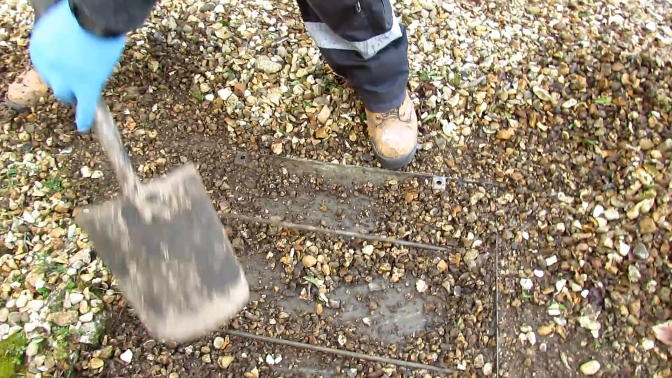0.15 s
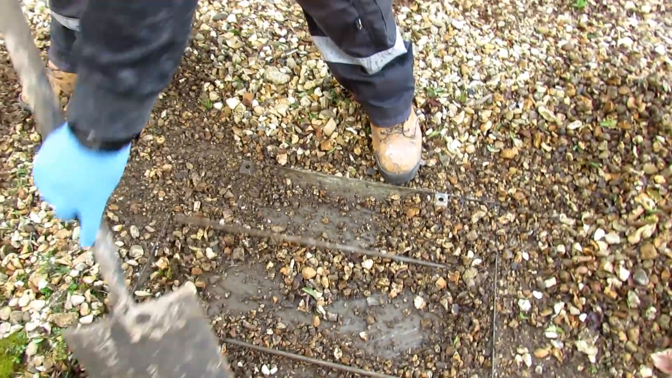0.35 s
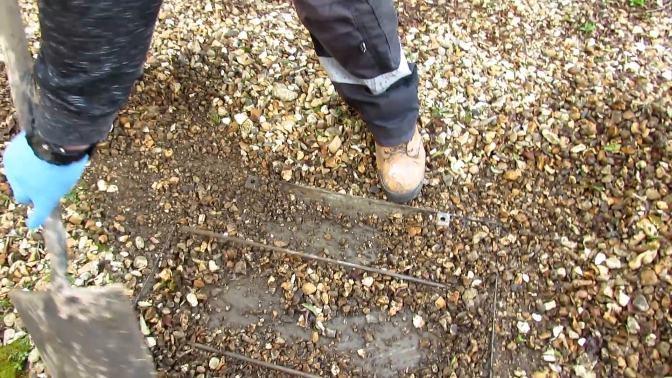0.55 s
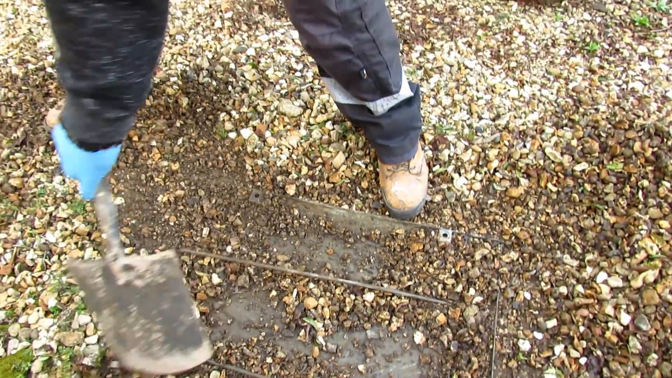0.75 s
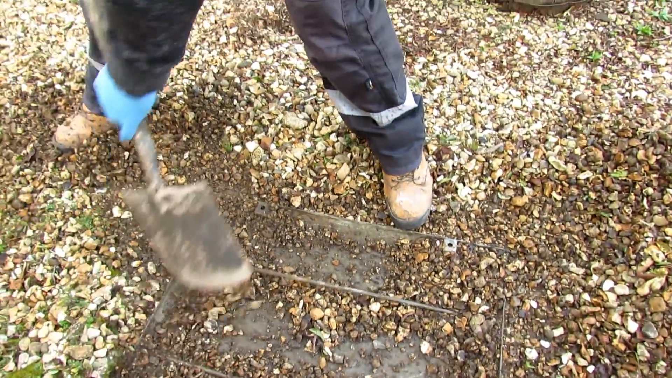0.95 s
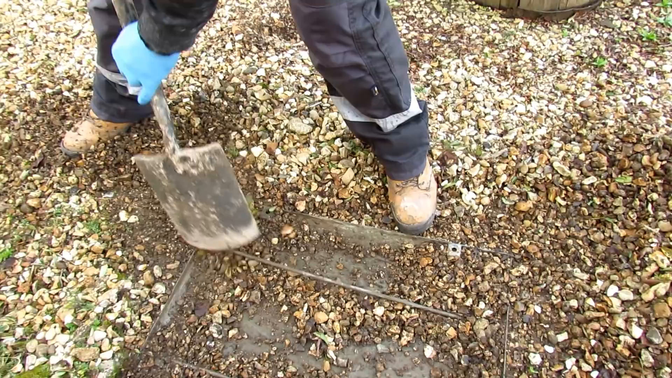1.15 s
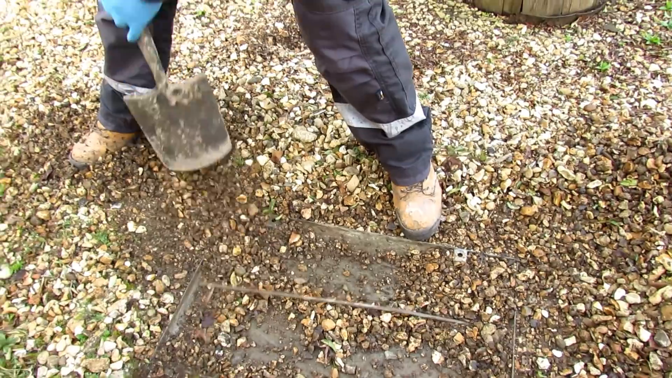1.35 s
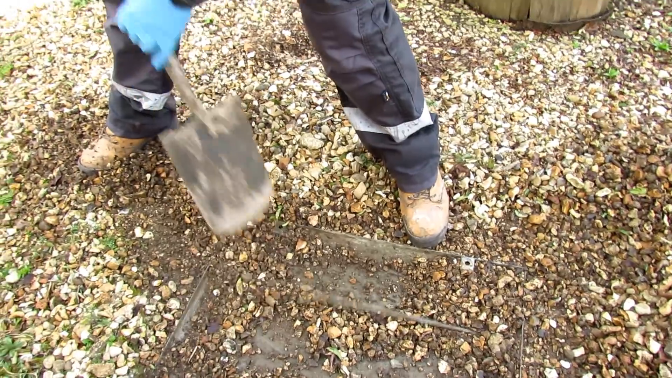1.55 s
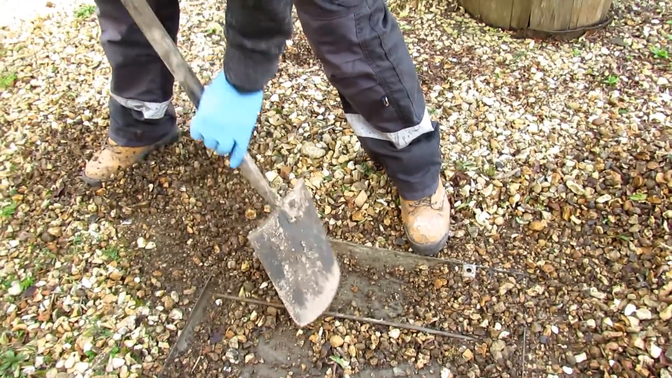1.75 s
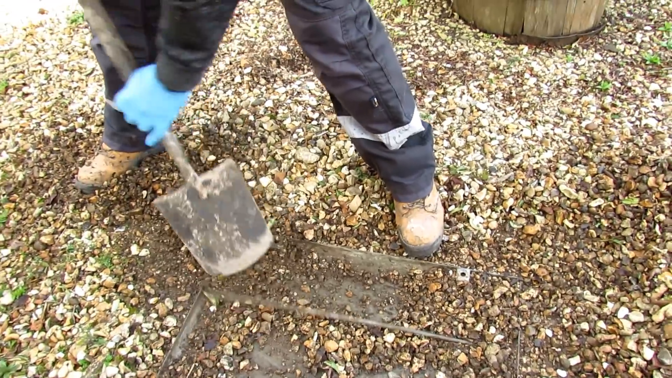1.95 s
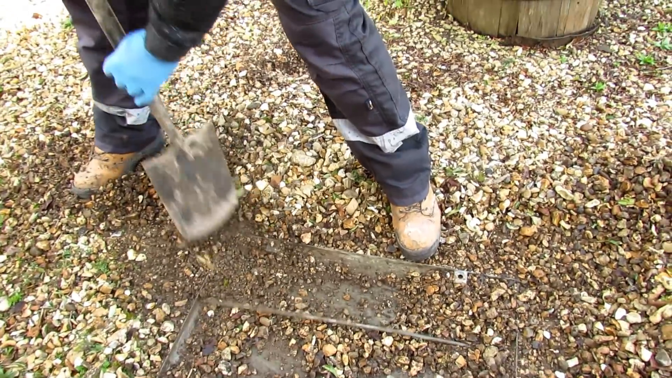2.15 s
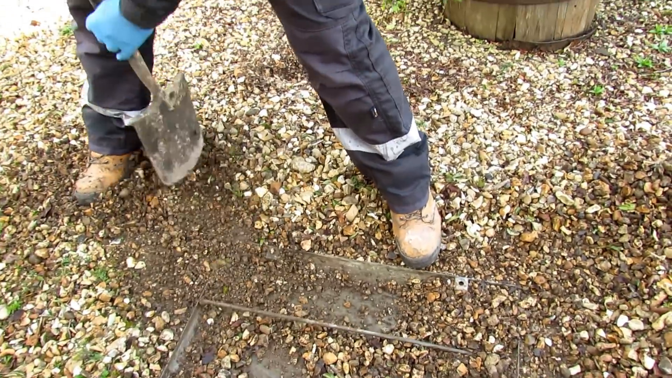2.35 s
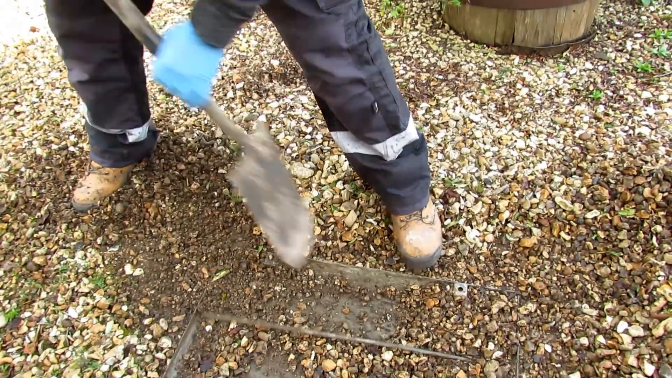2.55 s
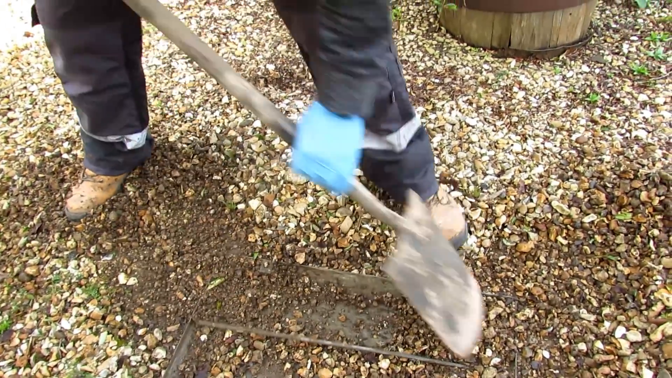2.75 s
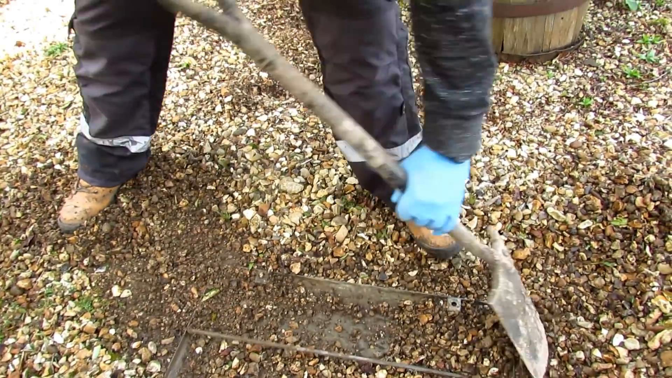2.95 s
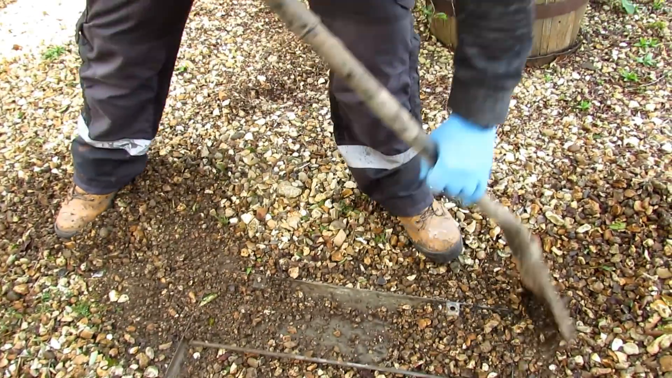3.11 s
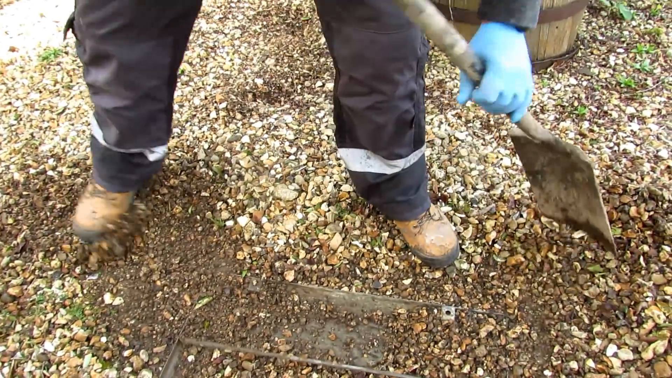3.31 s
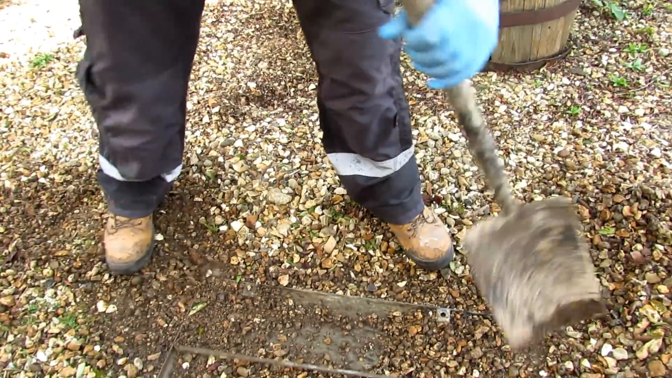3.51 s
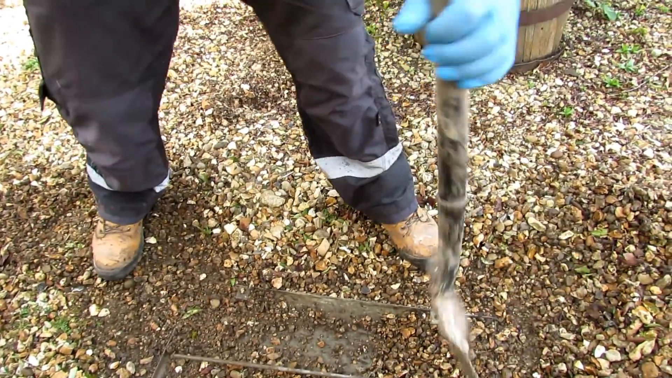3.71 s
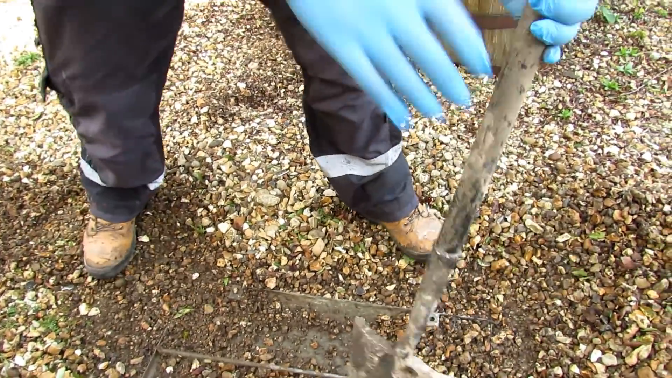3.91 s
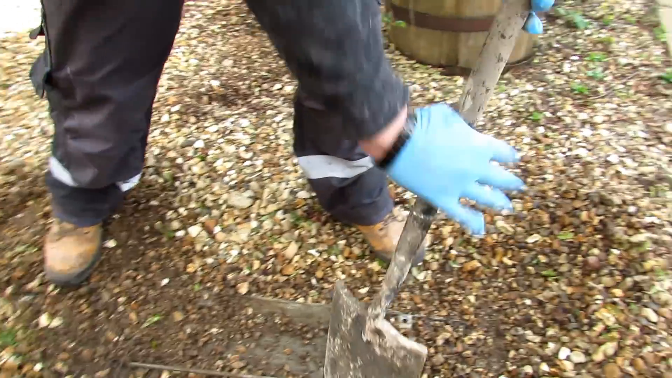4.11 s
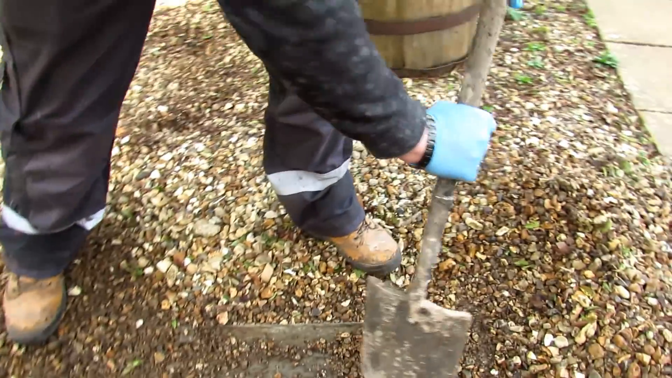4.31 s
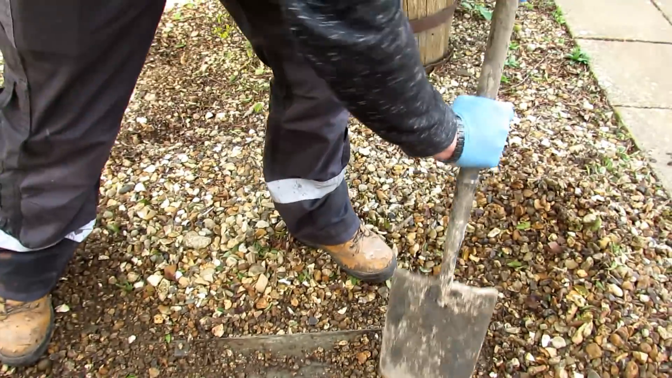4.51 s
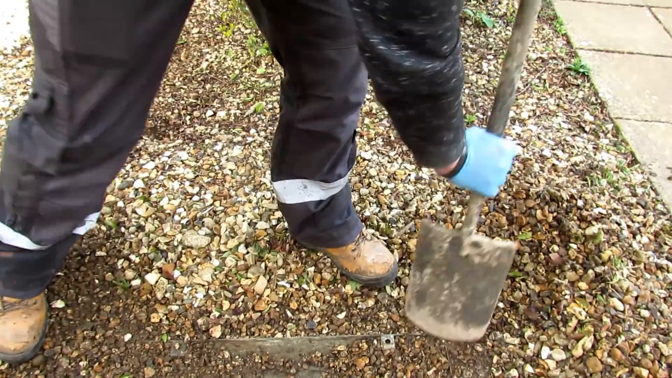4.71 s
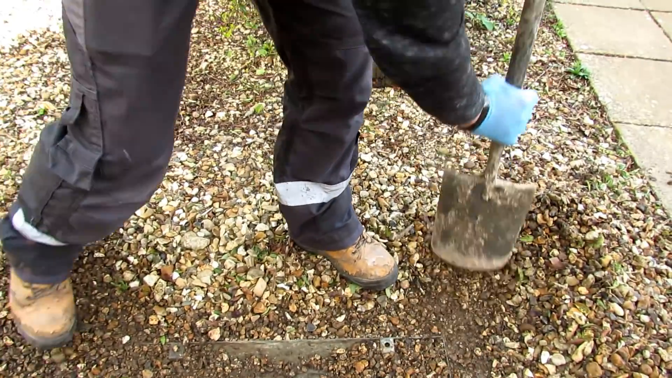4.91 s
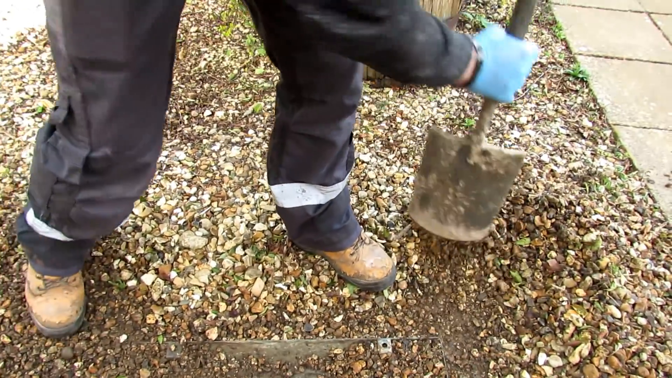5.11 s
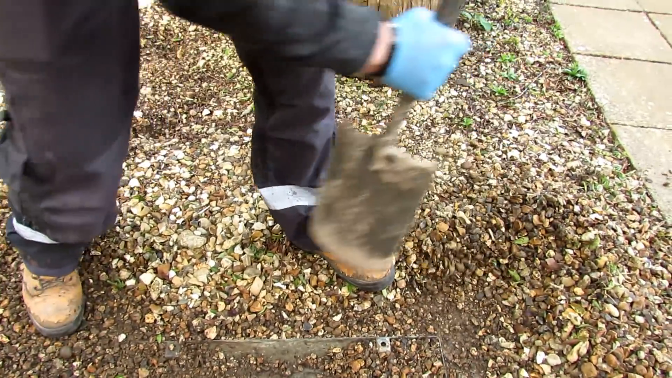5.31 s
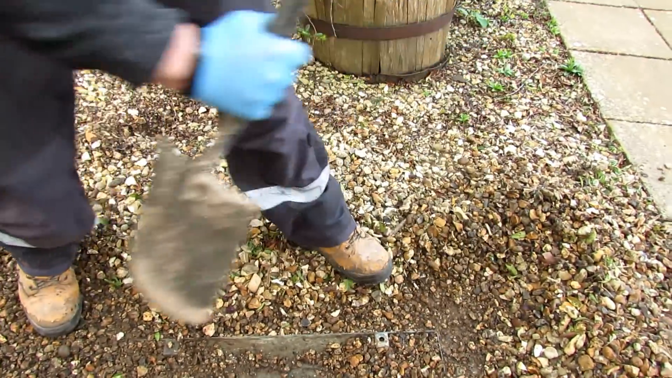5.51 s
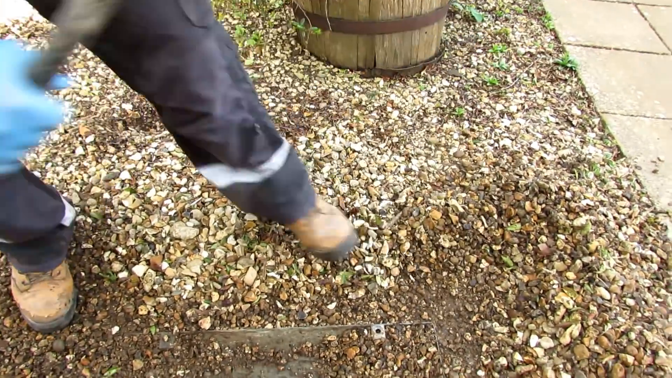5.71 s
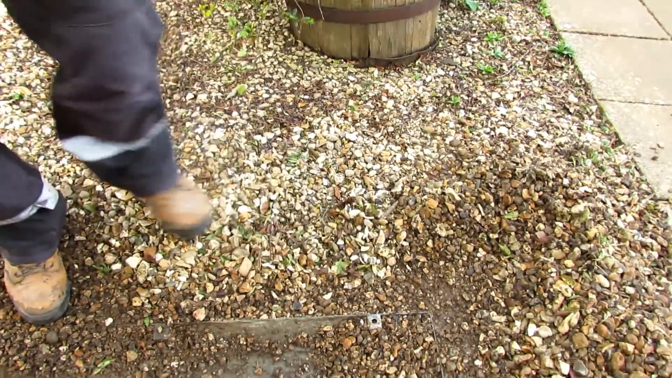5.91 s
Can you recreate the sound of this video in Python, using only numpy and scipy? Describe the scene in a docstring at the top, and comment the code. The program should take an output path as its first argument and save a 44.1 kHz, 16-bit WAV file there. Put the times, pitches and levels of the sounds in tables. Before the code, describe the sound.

Outdoors, close to a hand-held stereo microphone. Loose stones click and cloth brushes briefly in the first 0.25 seconds. From about 0.4 to 1.3 seconds a steel spade scrapes hard through gravel, coarse and bright, with rapid clattering knocks and short blade rings; it catches near 1.1 seconds, then finishes in a thinner rasp. A quiet gap leaves soft rustling and low rumble. A second grinding stroke runs from 1.75 to 2.3 seconds, starting abruptly and ending in sharp grit. Cloth swishes and dull taps follow; around 3.0 to 3.3 seconds the spade lightly knocks the ground with a faint ring and ticking pebbles. Muffled handling bumps and rustling fill the pause, the rumble swelling near 3.75. The third scrape, from 4.3 to 5.1 seconds, is crunchy with metallic clanks. Afterwards small stones tick and clothes rustle until 6 seconds, over faint far traffic.

```python
"""A steel spade is dragged in three strokes (the first catches halfway) through loose gravel over a drain
cover, and knocks the ground once between. Clumped random contacts make the grinding; bursts of them make
the knocks. Both excite resonators for the blade, the shaft and the stones. Loose stones tick, work clothes
swish (enveloped noisy grains), far traffic hums under shifting gravel (shaped noise), and wind and handling
rumble on the two ports of a hand-held recorder (low noise, largely opposite in the two channels)."""
import sys
import numpy as np
from scipy import signal
from scipy.fft import rfft, irfft, next_fast_len
from scipy.io import wavfile

SR = 44100
rng = np.random.default_rng(int(sys.argv[2]) if len(sys.argv) > 2 else 0)


def log_audio(samples):
    """Write samples as a 16-bit WAV file to the path given in sys.argv[1]."""
    # one column per channel
    frames = np.atleast_2d(samples).T
    # limit to full scale, then quantise
    limited = np.clip(frames, -1, 1)
    pcm = np.round(limited * 32767).astype(np.int16)
    wavfile.write(sys.argv[1], SR, pcm)


N = 267538   # length in samples
TINY = 1e-12   # keeps resonators from idling on exact zeros

# colour of stone on stone: (frequency [Hz], relative density [dB per Hz])
STONE_COLOUR = [(1000, -110), (2500, 2), (4500, 1), (7000, 8), (11000, 7), (16400, -8)]


def from_db(db):
    """Gain of a level in dB."""
    return 10 ** (np.asarray(db) / 20)


def rms_one(x):
    """Scale to unit rms."""
    return x / np.sqrt(np.mean(x ** 2) + 1e-20)


def sides(pan_db):
    """Left and right gains for a left-right difference in dB."""
    return from_db(np.array([pan_db / 2, -pan_db / 2]))


def in_time(tables, quiet_db=None):
    """Table columns at every sample; with quiet_db the first column falls to it outside the tables."""
    t = np.arange(N) / SR
    rows = np.vstack(tables)
    columns = [np.interp(t, rows[:, 0], column) for column in rows[:, 1:].T]
    if quiet_db is not None:
        inside = sum((t >= table[0][0]) & (t <= table[-1][0]) for table in tables)
        columns[0] = np.where(inside, columns[0], quiet_db)
    return columns


def response(spectrum, size=8192):
    """Causal (minimum-phase) impulse response of a spectrum, by folding its cepstrum."""
    hz, level_db = np.transpose(spectrum)
    log_hz = np.log(np.fft.rfftfreq(size, 1 / SR) + 1)
    cepstrum = irfft(np.log(from_db(np.interp(log_hz, np.log(hz), level_db))))
    cepstrum[1:size // 2] *= 2
    cepstrum[size // 2 + 1:] = 0
    return irfft(np.exp(rfft(cepstrum)))


def colour(x, spectrum):
    """Filter by a spectrum; white noise keeps its rms."""
    h = response(spectrum)
    h = (h / np.linalg.norm(h)).reshape((1,) * (x.ndim - 1) + (-1,))
    return signal.oaconvolve(x, h, axes=-1)[..., :N]


def resonance(x, hz, width_hz):
    """One mode: a two-pole resonator, gain 1 at its centre."""
    r = np.exp(-np.pi * width_hz / SR)
    gain = (1 - r * r) / 2
    return signal.lfilter([gain, 0, -gain], [1, -2 * r * np.cos(2 * np.pi * hz / SR), r * r], x)


def drift(rate_hz):
    """Slow random wander with unit rms: noise through two equal low-pass poles, at a 20th of the rate."""
    r = np.exp(-2 * np.pi * rate_hz * 20 / SR)
    noise = rng.standard_normal(N // 20 + 2002)
    slow = signal.lfilter([1], [1, -2 * r, r * r], noise)[2000:]   # skip the settling
    return np.interp(np.arange(N) / 20, np.arange(len(slow)), rms_one(slow))


def grains(per_s, spread_db, clump_db):
    """Random contacts of uneven size in clumps; both ports share a part and each has its own."""
    # part of the contacts that only one port hears: (frequency [Hz], level [dB])
    scatter = [(100, -7), (1000, -19), (3000, -2), (8000, 2.5), (15000, 0.5)]
    sizes = from_db(spread_db * np.minimum(rng.exponential(1, (3, N)), 4)) * rng.choice([-1, 1], (3, N))
    happens = rng.random((3, N)) < per_s / SR
    clumps = from_db(clump_db * (drift(16.7) + drift(94)))
    shared, *own = rms_one(sizes * happens * clumps)
    return shared + signal.oaconvolve(own, response(scatter)[None, :512], axes=1)[:, :N]


def bursts(at_s, level_db, t60_s, pan_db, rise_s=None):
    """Stereo envelopes of blows: each sets in, at once or over rise_s, and dies away by 60 dB."""
    out = np.zeros((2, N))
    for s, db, t60, pan in zip(at_s, level_db, t60_s, pan_db):
        start = round(s * SR)
        steps = np.arange(min(N - start, int(max(t60, .003) * SR)))
        rise = 1 if rise_s is None else 1 - np.exp(-steps / SR / rise_s)
        decay_db = db - 60 * steps / len(steps)
        out[:, start:start + len(steps)] += rise * from_db(decay_db + [[pan / 2], [-pan / 2]])
    return out


def swell(s, level_db, rise_s, fall_s):
    """Envelope that rises to its loudest and fades, 20 dB in each of the two times."""
    t = np.arange(N) / SR
    return from_db(level_db - 20 * np.where(t < s, (s - t) / rise_s, (t - s) / fall_s))


def spade():
    """Grinding and knocks share the gravel's colour, the ringing blade, the shaft and the grit."""
    # gravel, fine grit, and shaft with ground: (frequency [Hz], relative density [dB per Hz])
    gravel = [(290, -52.5), (600, -7.5), (1200, -4), (2200, -3), (3200, -1), (5000, -2), (7000, -2),
              (9100, -17), (15400, -90.5)]
    fine_grit = [(2940, -25.5), (5000, 0.5), (6440, 4.5), (6970, -9), (14900, -17), (15800, -38),
                 (16400, -30)]
    shaft_and_ground = [(41, -38), (70, -11.5), (200, -0.5), (280, -4.5), (358, -12.5), (476, -10.5),
                        (560, -11.5), (687, -10.5), (800, -8), (1040, -55), (1760, -120)]
    grind_body, grind_low, grind_high, low_modes, high_modes, uneven_db = grinding()
    knock_body, knock_low, knock_high, struck = knocking()
    ringing = blade(low_modes + struck, high_modes + struck, wander_db=2.0, damping_db=uneven_db)
    body = from_db(-4.5) * colour(grind_body + knock_body + ringing, gravel)
    push = grind_low + knock_low
    shaft = push + from_db(-7.5) * resonance(push, hz=210.8, width_hz=8)
    return body + colour(shaft, shaft_and_ground) + colour(grind_high + knock_high, fine_grit)


def grinding():
    """Dense contacts follow the strokes and feed stones, shaft, grit and blade modes in changing shares."""
    # blade in the gravel, a table a stretch, levels before the trims below: (time [s], grinding [dB],
    # low-mode ring re grinding [dB], high-mode ring re grinding [dB], fine grit re grinding [dB])
    strokes = [
        [(0.386, -39.5, -9, -7, -17), (0.448, -36, 1, -8, -8), (0.48, -26.5, 8, -25, -27),
         (0.498, -28, -28, -1, 0), (0.546, -20, 0.5, -9.5, -16.5), (0.606, -41, 5.5, -22, -9),
         (0.624, -29.5, -5.5, -7, -12), (0.756, -32.5, -10.5, -7.5, -9.5), (0.866, -21, -17.5, -17.5, -11),
         (0.894, -44, -2, -8, -10), (0.904, -17, -19, -4, -8), (0.944, -20.5, -9, -19, -13),
         (1.024, -14, -19, -23, -13), (1.11, -42.5, -9, -4, -7)],
        [(1.112, -41, -2, -9, -3.5), (1.192, -17.5, -13.5, 1, -10), (1.21, -38, -17, -8, -2),
         (1.216, -39, -28, -18, 1.5), (1.26, -26, -22, -6.5, -8.5), (1.47, -69, -7, -26, 1)],
        [(1.759, -10, -5, -27, -21), (1.777, -39, -17, 11, -1), (1.793, -32, -21, -5, -4),
         (1.827, -45.5, -22, 6, -1), (1.857, -25, -2.5, -3, -18), (1.893, -18, -15, -5, 3),
         (1.937, -24.5, -10, -19, -15.5), (2.213, -32, -7, -1, 0.5), (2.225, -11, -38, -22, -2),
         (2.243, -27.5, -21, -7, -3), (2.36, -59, -9, -23, -4)],
        [(2.957, -32, -31, -14, -7), (2.987, -31, -11, -21, -14), (3.027, -57, -13, -5, -2.5),
         (3.187, -36.5, -11, -0.5, -11), (3.219, -53, 3, -8, -10), (3.245, -41.5, -17, -5, 1),
         (3.3, -52, -13, -8, -17)],
        [(4.337, -36, -12, -21, -21), (4.359, -32.5, -25, -5, -13), (4.413, -31.5, -5, -5, -18),
         (4.455, -19.5, -25, -3, -18), (4.477, -39, -2, -10, -17), (4.573, -30.5, -7.5, -4.5, -9),
         (4.589, -22.5, -21, 3, -9), (4.639, -35, -5, -2, -5.5), (4.737, -13, -6.5, -22, -20),
         (4.743, -23.5, -4.5, -8, -14), (4.911, -24, -16, -10.5, -5.5), (4.933, -33, -6, -11, -3),
         (5.08, -50.5, -5, -19, -14)],
    ]
    # how the spade is held in each stretch: (low drag re grinding [dB], unevenness of the gravel's
    # damping [dB], left-right at start [dB], left-right at end [dB])
    grips = [(-10.5, 5.5, 4, 2.5), (-14.5, 5.5, 1.5, 6), (-25.5, 4, -0.3, 4), (-15, 3.0, -3, -3),
             (-18, 2, -3.8, -1.5)]
    grind_db, low_ring_db, high_ring_db, grit_db = in_time(strokes, quiet_db=-120)
    held = []
    for rows, (drag, uneven, start_pan, end_pan) in zip(strokes, grips):
        held.append([(rows[0][0], drag, uneven, start_pan), (rows[-1][0], drag, uneven, end_pan)])
    drag_db, uneven_db, pan_db = in_time(np.vstack(held)[None])
    contacts = grains(3500, spread_db=3.0, clump_db=2.54)
    stroke = from_db(grind_db - 12.5) * sides(pan_db)
    grind = contacts * stroke
    stony = from_db(2.5) * pebbles(contacts, count=16, cycles=1.5) * stroke
    body = from_db(4.5) * grind + stony
    low, high = grind * from_db(drag_db), grind * from_db(grit_db + 12.5)
    low_modes, high_modes = grind * from_db(low_ring_db + 26.5), grind * from_db(high_ring_db + 21.5)
    return body, low, high, low_modes, high_modes, uneven_db


def pebbles(contacts, count, cycles):
    """Contacts are dealt, a few milliseconds at a time, to stones of many sizes; each rings a few cycles."""
    dealt = np.repeat(rng.integers(0, count, N // 200 + 1), 200)[:N]
    out = 0
    for k, hz in enumerate(np.geomspace(900, 7500, count)):
        out = out + resonance(contacts * (dealt == k) + TINY, hz, hz / cycles) * np.sqrt(cycles)
    return rms_one(out)


def knocking():
    """Each knock is a sudden touch and a rattle, a push down the shaft, a crack and the stone's own pitch."""
    # stones and cover against the blade, before the trims and decay factors below: (time [s],
    # peak [dB], thud re peak [dB], crack re peak [dB], blade ring re peak [dB], first touch re peak [dB],
    # pitch of the stone [Hz], 60 dB decay [s], left-right [dB])
    knocks = [(0.143, -15, -45, -14, -11, -3, 3160, 0.05, -1.5),
              (0.386, -20, -37, -28, -10, -6, 2570, 0.041, 2),
              (0.416, -21, -18.5, -25, -11, -7, 2700, 0.05, 6),
              (0.431, -20, -21, -40, -6, -9, 2820, 0.041, -1),
              (0.459, -17, -16, -30, -19, -9, 1560, 0.025, 3.5),
              (0.471, -1, -18, -26, -30, -15, 1870, 0.021, 0),
              (0.491, -6.5, -52, -12, -3, -13, 2700, 0.039, 3.5),
              (0.51, -9, -26, -15, -2.5, -5, 4720, 0.14, 4.5),
              (0.534, 3.5, -42, -24, -4, -16, 1473, 0.043, 4.0),
              (0.625, -4.5, -28, -22, -3.5, -9, 2700, 0.044, 5.5),
              (0.652, -15, -11.5, -21, 1, -11, 2750, 0.067, -0.5),
              (0.676, -13.5, -26, -27, -15, -1, 1460, 0.038, 12),
              (0.827, -10.5, -23, -22, -11, -5.5, 2910, 0.042, 3),
              (0.857, -9, -16, -23, -13, -13, 3730, 0.027, 2.5),
              (0.905, -0.5, -38, -17.5, -3.5, -8.5, 3710, 0.027, 4.0),
              (0.933, 1.5, -16.5, -26, -9, -12, 1570, 0.029, 2.0),
              (0.969, -14, -15, -17, -4, -12, 2740, 0.041, 3),
              (1.014, 0.5, -43, -14, -5.5, -18, 2380, 0.08, 1),
              (1.036, -6.5, -35, -14, 3, -12, 4900, 0.021, 3.5),
              (1.14, -19, -30, -15, -4, -12, 5330, 0.12, 2.5),
              (1.153, -11, -38, -34, -15, -14, 2800, 0.059, 2.0),
              (1.184, -7.5, -50, -31, 2, -12, 2860, 0.022, 3.5),
              (1.217, -14, -46, -15, -16, -7, 6350, 0.05, -3),
              (1.239, -28, -41, 4.5, -15, -7, 6040, 0.03, 6),
              (1.253, -5.5, -43, -12, -10, -9, 3400, 0.028, -5),
              (1.284, -16.5, -38, -9, -1.5, 1, 2510, 0.092, 1),
              (1.756, -9.5, -13.5, -28, -21, -11, 2740, 0.035, 2),
              (1.785, -7, -20, -17, -7, -9, 2720, 0.047, -2),
              (1.796, -12.5, -35, -8, -8, -4, 2730, 0.067, -1.0),
              (1.852, -14, -40, -30, -6, -11, 2700, 0.039, 0.0),
              (1.861, -8, -22.5, -28, -7, -9, 2720, 0.075, 1.0),
              (1.887, -2.5, -38, -28, -5, -5, 3700, 0.048, 1.5),
              (1.898, -7, -44, -23, -4, -5, 2660, 0.052, -7),
              (1.905, -11, -27, -8.5, -5, -9, 1900, 0.042, 9),
              (1.915, -16.5, -9.5, -3.5, -14, -9, 3870, 0.083, 0.5),
              (1.929, -14, -34, -14, -8, -9, 2710, 0.1, 1.5),
              (1.954, -13.5, -29, -9.5, -15, -12, 3840, 0.083, 2.0),
              (1.971, -2.5, -49, -23, -33, -5, 1463, 0.065, 1),
              (1.995, -2, -12, -28, -24, -3.5, 1410, 0.018, 2.0),
              (2.031, -24.5, -8, -22, -21, -5, 1180, 0.039, 4),
              (2.058, -14, -12, -31, -22, -9, 1840, 0.022, 1.5),
              (2.089, -15, -29, -31, -15, -9, 6430, 0.067, -1),
              (2.112, -8.5, -21, -18, -7, -13, 5570, 0.11, 2.0),
              (2.142, -19, -41, -22, -3, -9, 5400, 0.074, 6),
              (2.221, -16, -52, -9, -12, -13, 6300, 0.023, 11),
              (2.223, -20, -50, 5, -19, -11, 5000, 0.037, -9),
              (2.959, -23, -20, -22, -1.5, -8, 4560, 0.13, -6),
              (3.109, -25.5, -27, -18, -10, -7, 1200, 0.066, -1.5),
              (3.143, -23, -37, -18, -10, -7, 2000, 0.042, -1.5),
              (3.165, -15.5, -47, -20, -6, -5, 1984, 0.03, -2.5),
              (3.179, -19.5, -54, -21, 2, -3, 2010, 0.059, -4),
              (4.338, -22.5, -30, -32, -10, -7, 2720, 0.034, -10),
              (4.347, -22, -9, -11, -17, -9, 1545, 0.065, 2),
              (4.364, -10, -33, -43, -18, -5, 4080, 0.05, -3),
              (4.382, -18, -19, -12, -5, -9, 3000, 0.041, 3),
              (4.424, -12, -30, -18, -23, -9, 6430, 0.039, 2),
              (4.446, -5, -16.5, -43, -1, -23, 2760, 0.048, 0.5),
              (4.496, -23, -15.5, -10.5, -10, -9, 2700, 0.13, 2),
              (4.532, -14.5, -35, -17, -4, -5, 3370, 0.055, 0),
              (4.574, -13, -36, -11, -6, -7, 6740, 0.028, 1),
              (4.59, -0.5, -58, -7, -16, -14, 6800, 0.017, -3.5),
              (4.65, -17, -36, -14, -7, -9, 2770, 0.05, 0),
              (4.671, -6, -36, -19.5, -24, -10, 1510, 0.041, 2),
              (4.713, -6, -36, -13, -22, -16, 3300, 0.057, -4),
              (4.731, 2, -18.5, -15, -10, -6, 2796, 0.041, 1.5),
              (4.781, -5, -24.5, -16, -18, -12, 2750, 0.095, -2),
              (4.817, -11, -47, -15, 4, -2, 3940, 0.099, -3.5),
              (4.841, -8, -51, -15.5, -2, -12, 2970, 0.064, -3.5),
              (4.873, -10.5, -47, -26, -16, -6, 3490, 0.055, -6),
              (4.901, -7, -42, -20, -17, -8, 4126, 0.066, -6),
              (4.949, -26.5, -39, -19, -12, -9, 1820, 0.05, -16)]
    s, peak_db, thud_db, crack_db, struck_db, touch_db, stone_hz, t60_s, side_db = np.transpose(knocks)
    rise_s = 0.0023
    rattle = grains(14000, spread_db=1.5, clump_db=1.0)
    touch = rng.choice([-1, 1], N) * bursts(s, peak_db + touch_db, t60_s / 25, side_db)
    blows = rattle * bursts(s, peak_db - 10.5, t60_s, side_db, rise_s) + touch + TINY
    body = blows + from_db(19.5) * stone_rings(blows, s, stone_hz, width_share=0.024)
    struck = rattle * bursts(s, peak_db + struck_db, 0.4 * t60_s, side_db) + TINY
    low = rattle * bursts(s, peak_db + thud_db - 11, 3.12 * t60_s, side_db, rise_s)
    # one push of a single sign down the shaft
    low = low + bursts(s, peak_db + thud_db - 12.5, t60_s / 12, side_db) + TINY
    high = rattle * bursts(s, peak_db + crack_db + 0.5, 0.64 * t60_s, side_db)
    return body, low, high, struck


def stone_rings(force, at_s, pitch_hz, width_share):
    """The stone that is hit adds its own pitch to the blow."""
    out, length = np.zeros((2, N)), SR // 25
    fading = from_db(-30 * np.arange(length) / length)
    for s, hz in zip(at_s, pitch_hz):
        start = round(s * SR)
        push = force[:, start:start + length] * fading
        out[:, start:start + length] += resonance(push, hz, width_share * hz)
    return out


def blade(low_force, high_force, wander_db, damping_db):
    """The modes ring; the contact point wanders, so each gets a changing share, and gravel damps it unevenly."""
    # modes of the blade: (frequency [Hz], width [Hz], level [dB])
    modes = [(540, 29, 2), (983, 110, -13), (1217, 8.3, 5), (1533, 180, -6), (1521, 35, -2.5),
             (1895, 40, -11), (1967, 20, 0.5), (2380, 11, -12), (2600, 32, -4.5), (2803, 35, 3.5),
             (2779, 38, -2), (2970, 73, -4.5), (3320, 5, -3.5), (3600, 34, -10), (3730, 10, 5.5),
             (3860, 74, -6.5), (4690, 17, -3), (4820, 16, -26), (4900, 110, -5), (5340, 92, -1.5),
             (5500, 13, -13), (5920, 34, -10), (6300, 36, 5), (7560, 68, -21)]
    out = 0
    for hz, width_hz, level_db in modes:
        force = low_force if hz < 2300 else high_force
        ringing = resonance(force * from_db(level_db + wander_db * drift(2.4)), hz, width_hz)
        out = out + ringing * from_db(damping_db * drift(58))
    return out


def stones():
    """Stone on stone: a snap and a bright rattle over a duller knock."""
    # loose stones falling or under a boot, levels before the trims below: (time [s], peak [dB],
    # dull part re peak [dB], 60 dB decay [s], left-right [dB])
    ticks = [(0.0268, -40, -4, 0.013, 1), (0.0501, -6.5, -14, 0.02, 0), (0.0898, -18, -3.5, 0.021, 2.0),
             (0.1137, -39, -1, 0.013, 4), (0.1439, -12, -19.5, 0.012, 3), (0.181, -30.5, -13, 0.013, 1.5),
             (0.2277, -37.5, -14, 0.013, 2.5), (1.384, -31, -17, 0.011, -5), (1.391, -26, -28, 0.0079, 6),
             (1.4094, -33, -20, 0.012, -5), (1.4448, -31.5, -28, 0.011, 10), (2.4557, -27, -45, 0.011, 9),
             (2.5718, -36.5, -22, 0.016, -13), (2.7267, -33, -15, 0.013, -4), (2.785, -23, -30, 0.012, -2),
             (2.834, -26, -35, 0.012, 1), (2.8776, -34, -23, 0.0095, -2), (2.9567, -16, -22, 0.013, -2),
             (3.029, -39, -18, 0.013, 2), (3.1046, -24.5, -5.5, 0.013, 1), (3.2084, -21.5, -26, 0.015, 0),
             (3.235, -17, -35, 0.012, -1.0), (3.2414, -18, -29.5, 0.013, -1.5),
             (3.2508, -16.5, -27, 0.014, -1.5), (3.3162, -21.5, -35, 0.01, -2),
             (3.3587, -21.5, -30, 0.008, -8), (3.696, -28, -4, 0.014, 3.0), (4.075, -31, -19, 0.013, 0.0),
             (5.0492, -26.5, -28, 0.011, 7), (5.0716, -31, -19, 0.013, 1.0), (5.116, -22, -12, 0.01, -2),
             (5.127, -26, -21, 0.013, 0.0), (5.1562, -25.5, -10, 0.013, -4), (5.1894, -35, -15, 0.013, -4),
             (5.2305, -26.5, -31, 0.014, -0.5), (5.2494, -34, -21, 0.013, -4),
             (5.2654, -31, -22, 0.0043, -5), (5.3376, -16, -39, 0.014, -1), (5.3734, -38, -11, 0.013, 1.0),
             (5.3859, -30, -11, 0.013, 0.0), (5.4241, -23, -21, 0.0057, -1.5),
             (5.5258, -36.5, -13, 0.012, -6), (5.566, -32, -10.5, 0.011, 3.0), (5.6184, -35, -27, 0.013, 7),
             (5.7114, -22, -28, 0.011, 1.0), (5.7214, -27, -23, 0.013, 1.5), (5.733, -21, -26, 0.013, 3.0),
             (5.7446, -19, -18, 0.013, -1), (5.753, -25, -28, 0.015, 16), (5.7664, -24, -33, 0.014, 6),
             (5.8247, -31.5, -45, 0.012, 10), (5.8961, -21, -27, 0.018, 2), (5.9095, -29, -27, 0.013, 2.0),
             (5.9716, -16.5, -19, 0.0092, 2), (5.9993, -29, -24, 0.013, 10), (6.0235, -26.5, -33, 0.011, 2)]
    s, peak_db, dull_db, t60_s, side_db = np.transpose(ticks)
    rattle = grains(25000, spread_db=-4.0, clump_db=0.75)
    snap = rng.choice([-1, 1], N) * bursts(s, peak_db - 8.0, t60_s / 6, side_db)
    bright = rattle * bursts(s, peak_db - 12, t60_s, side_db)
    band = signal.butter(2, [500, 2500], "band", fs=SR, output="sos")
    dull = signal.sosfilt(band, rattle * bursts(s, peak_db + dull_db + 0.5, t60_s, side_db) + TINY)
    return colour(snap + bright, STONE_COLOUR) + dull


def dull_knocks():
    """A short noisy push into one broad resonance."""
    # perhaps glove on shaft or boot on ground, before the trim below: (time [s], peak [dB],
    # pitch [Hz], 60 dB decay of the push [s])
    soft_knocks = [(2.31, -26, 660, 0.01), (2.35, -29, 570, 0.013), (2.572, -31.5, 684, 0.014),
                   (2.78, -31.5, 940, 0.036), (2.883, -45, 960, 0.02), (3.107, -29, 1134, 0.016),
                   (3.453, -38, 840, 0.02), (3.569, -32.5, 910, 0.02), (3.692, -32, 932, 0.0071),
                   (3.8, -28.5, 1600, 0.013), (3.942, -32.5, 670, 0.016), (4.08, -30.5, 790, 0.0064),
                   (4.145, -37.5, 900, 0.017), (4.181, -41, 980, 0.013), (5.167, -37, 1030, 0.031),
                   (5.58, -29.5, 1070, 0.017), (5.625, -28, 846, 0.017)]
    out, noise = np.zeros((2, N)), rng.standard_normal(N)
    length = SR // 10
    for s, peak_db, hz, t60_s in soft_knocks:
        start = round(s * SR)
        push = noise * bursts([s], [peak_db + 9.5], [t60_s], [0])
        out[:, start:start + length] += resonance(push[:, start:start + length], hz, hz / 2)
    return out


def swishes():
    """Envelopes of each movement: the whole swish and its top."""
    # swishes of cloth: (time of the loudest [s], level [dB], rise over 20 dB [s], fall over 20 dB [s],
    # top re swish before the trim below [dB])
    movements = [(.055, -39.5, 0.08, 0.089, -27), (1.385, -58, 0.3, 0.12, 4), (2.41, -49, 0.31, 0.24, -6),
                 (2.78, -53, .3, 0.074, -4), (2.962, -30, 0.013, 0.032, -22), (3.165, -44, 0.085, .06, -2),
                 (3.249, -45, 0.015, 0.014, -21), (3.49, -44, 0.27, 0.15, 6), (3.8, -41, .1, 0.13, -4),
                 (3.85, -46, 0.095, 0.082, -4.5), (4.13, -47, 0.27, 0.21, -10),
                 (5.08, -45.5, 0.34, 0.95, -11), (5.34, -55, 0.021, 0.013, 3),
                 (5.428, -74, 0.033, 0.022, -24), (5.63, -63, 0.1, 0.039, -1), (5.755, -41, .12, .07, -12),
                 (5.88, -50.5, 0.28, 0.053, -1), (5.98, -49.5, 0.12, 0.15, -27)]
    whole = top = from_db(-79.5)   # cloth at rest
    for s, level_db, rise_s, fall_s, top_db in movements:
        one = swell(s, level_db, rise_s, fall_s)
        whole, top = whole + one, top + one * from_db(top_db + 4.5)
    return whole, top


def clothes(whole, top):
    """Dense fibre contacts swish; the treble above 9.5 kHz follows its own envelope."""
    # rubbing cloth: (frequency [Hz], relative density [dB per Hz])
    cloth_colour = [(1500, -3), (3000, -9), (4500, -7.5), (6000, -2.5), (8000, -1), (11000, -4),
                    (14000, -5), (16400, -10.5)]
    rubbing = grains(11000, spread_db=7.0, clump_db=1.64) * sides(1.5)[:, None]
    cloth = colour(rubbing, cloth_colour)
    lower = signal.sosfilt(signal.butter(1, 9500, fs=SR, output="sos"), cloth)
    return lower * whole + (cloth - lower) * top


def patter(whole):
    """Small stones set rolling by each movement, sparse contacts 12.5 dB under the swish."""
    rolling = grains(280, spread_db=5.5, clump_db=2.0)
    return colour(rolling, STONE_COLOUR) * from_db(-12.5) * whole


def ground_and_traffic():
    """Gravel shifts as grains over far traffic as noise, under one level curve."""
    # between the strokes, before the trim below: (time [s], level [dB])
    shifting = [
        [(0.0, -51.5), (0.042, -59), (0.048, -54), (0.138, -60), (0.142, -56.5), (0.238, -60), (0.38, -59.5)],
        [(1.4, -62.5), (1.578, -64), (1.612, -63.5), (1.624, -65), (1.688, -60), (1.742, -60.5), (1.75, -61)],
        [(2.3, -59.5), (2.356, -56), (2.462, -68.5), (2.57, -60), (2.68, -61.5), (2.778, -58), (2.95, -72)],
        [(3.0, -65), (3.076, -61.5), (3.106, -61), (3.318, -65.5), (3.458, -56), (4.316, -63.5), (4.32, -62.5)],
        [(5.05, -58.5), (5.55, -61.5), (5.63, -57.5), (5.654, -62), (5.77, -62), (5.802, -71), (6.067, -67.5)],
    ]
    # outdoor hum: (frequency [Hz], relative density [dB per Hz])
    outdoors = [(59, -13), (100, -13.5), (290, -12), (429, -11.5), (737, -10), (1500, -11), (2200, -17.5),
                (3500, -17.5), (5000, -24.5), (8000, -33)]
    level_db, = in_time(shifting)
    ground = grains(5000, spread_db=4.5, clump_db=1.5) + 1.01 * rng.standard_normal((2, N))
    return colour(ground * from_db(level_db + 3), outdoors)


def rumble():
    """Lumpy wind and handling pressure across the ports: largely opposite in the two channels."""
    # gusts and handling bumps: (time of the loudest [s], level [dB], rise over 20 dB [s],
    # fall over 20 dB [s])
    bumps = [(.3, -59, 0.19, .1), (.48, -71, .05, 0.18), (.88, -55, 0.2, 0.22), (1.2, -62, 0.091, .1),
             (1.35, -55.5, .1, 0.14), (1.6, -54.5, 0.092, 0.13), (1.801, -45, 0.11, 0.072),
             (1.92, -58, 0.045, .1), (2.01, -43, 0.087, 0.061), (2.12, -60, .06, .2),
             (2.33, -48, 0.086, 0.083), (3.0, -66, .1, .2), (3.6, -56, 0.07, .2),
             (3.75, -39.5, 0.094, 0.11), (4.14, -55.5, .25, 0.31), (4.37, -52, .08, .12),
             (4.47, -40.5, 0.043, 0.13), (4.74, -59, 0.046, 0.23), (5.09, -52, 0.044, 0.14),
             (5.46, -63, 0.27, .15), (5.7, -62, .3, 0.45), (6.06, -55, .25, .1)]
    # wind at the ports: (frequency [Hz], relative density [dB per Hz])
    wind = [(8.8, -49), (15, -11.5), (60, 7.5), (125, 1), (160, -10.5), (198, 4.5), (300, -29), (390, -39),
            (660, -120)]
    calm_db, port_phase_rad = -69.5, 2.04
    level = from_db(calm_db) + sum(swell(*bump) for bump in bumps)
    shared = signal.hilbert(rng.standard_normal(N), next_fast_len(N))[:N]
    ports = np.real([shared, shared * np.exp(1j * port_phase_rad)])
    ports = ports + 0.46 * rng.standard_normal((2, N))   # each port's own turbulence
    return colour(ports * level * from_db(1.4 * drift(19.0)), wind)


def port_spacing(x):
    """Sound reaches the left port first: a phase ramp delays the right one."""
    left_lead_s = .00003
    hz = np.fft.rfftfreq(N, 1 / SR)
    late = irfft(rfft(x[1]) * np.exp(-2j * np.pi * hz * left_lead_s), N)
    return np.array([x[0], late])


def scene():
    """All sources at the two ports; the rumble arises at the ports themselves."""
    whole, top = swishes()
    near = spade() + stones() + dull_knocks()
    background = clothes(whole, top) + patter(whole) + ground_and_traffic()
    return port_spacing(near + background) + rumble()


def record(dry):
    """Peaks are rounded near full scale, and the top is cut (50 dB down from 16.5 kHz)."""
    low_pass = signal.cheby2(20, 50, 16500, fs=SR, output="sos")
    return signal.sosfilt(low_pass, np.tanh(dry))


dry = scene()
out = record(dry)
log_audio(out)
```